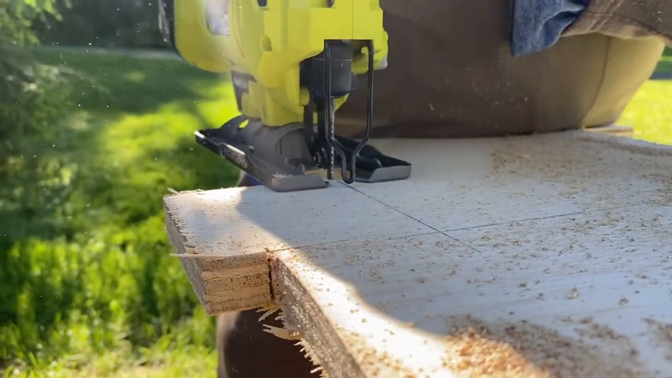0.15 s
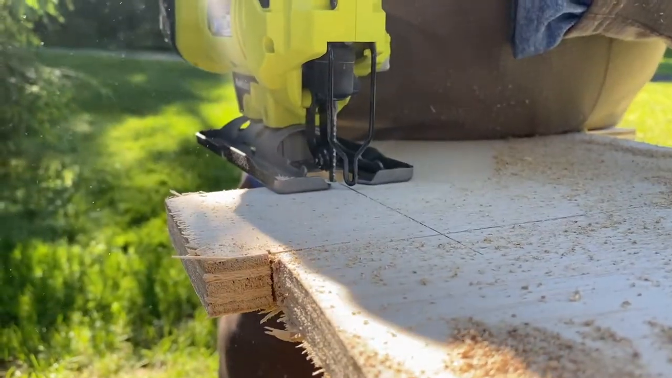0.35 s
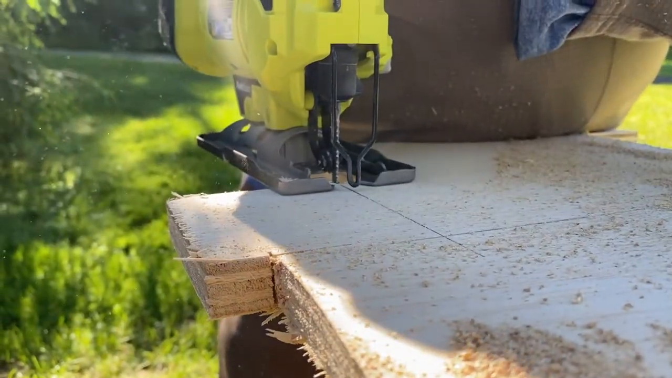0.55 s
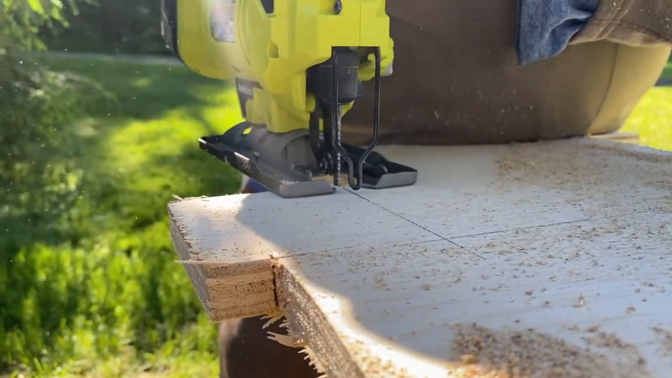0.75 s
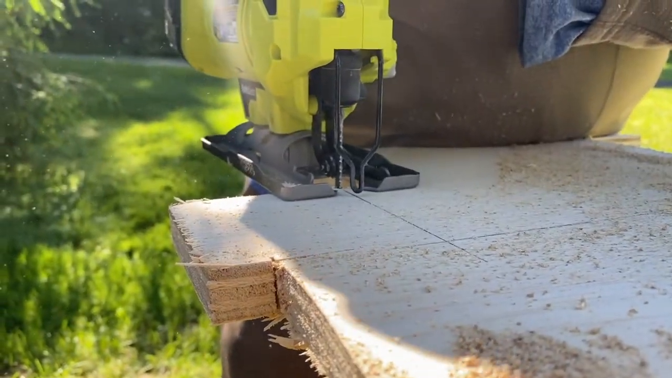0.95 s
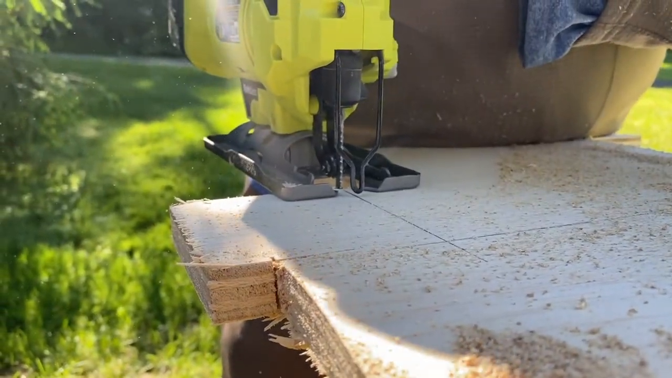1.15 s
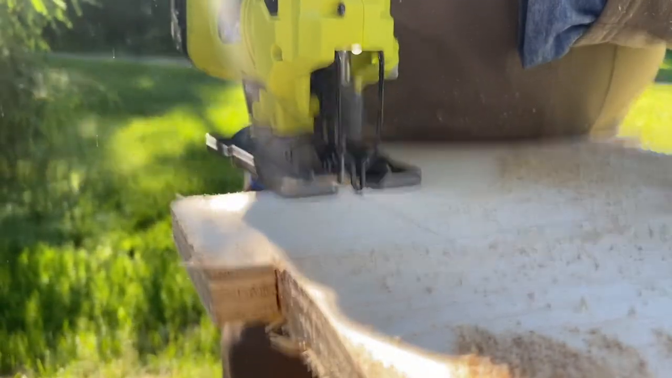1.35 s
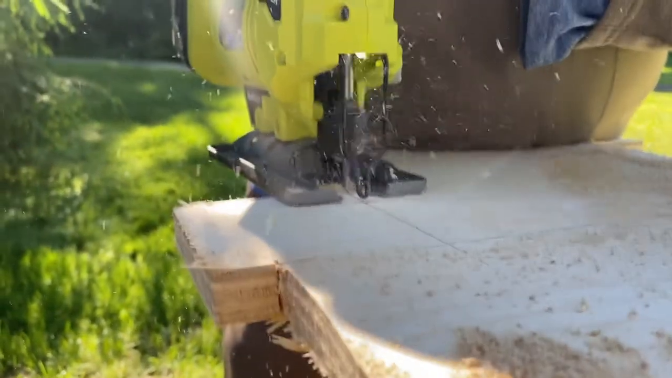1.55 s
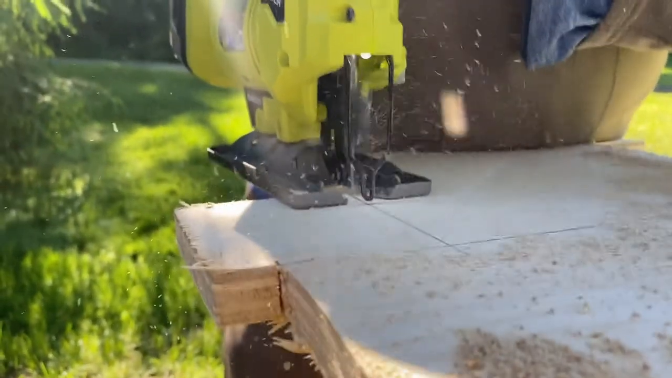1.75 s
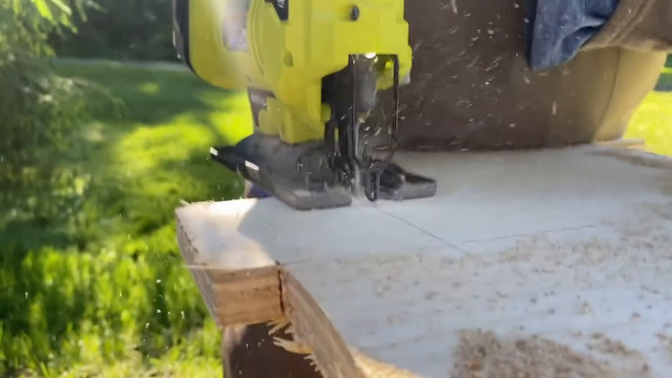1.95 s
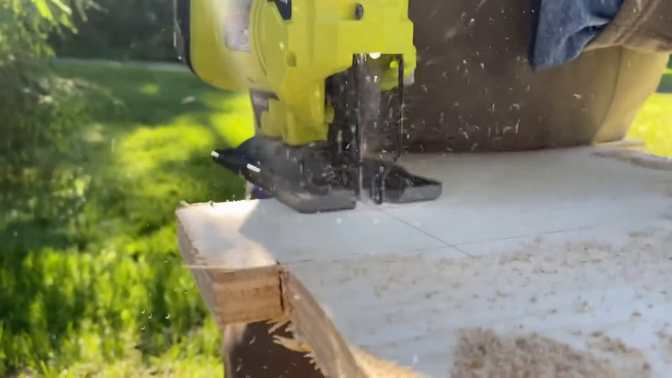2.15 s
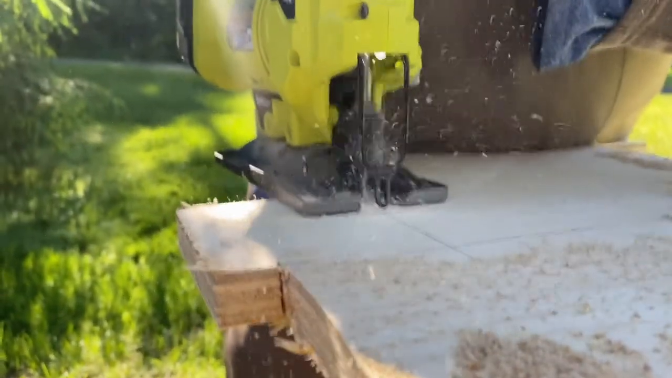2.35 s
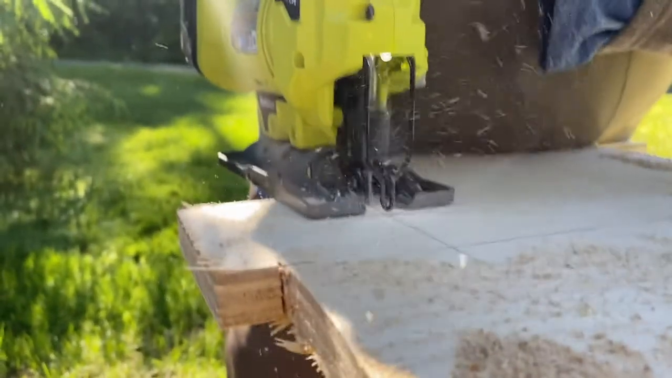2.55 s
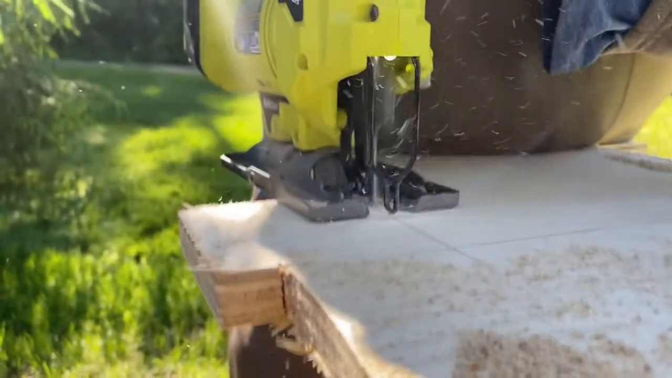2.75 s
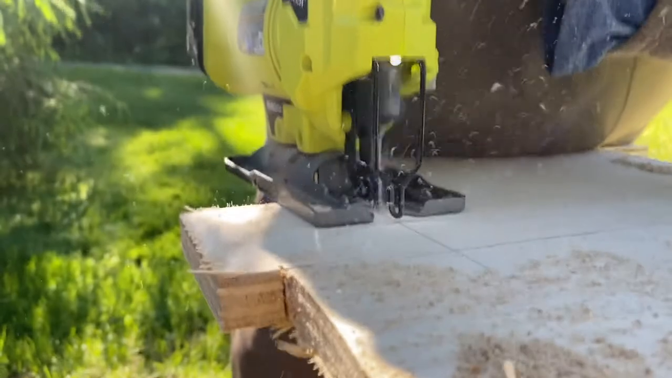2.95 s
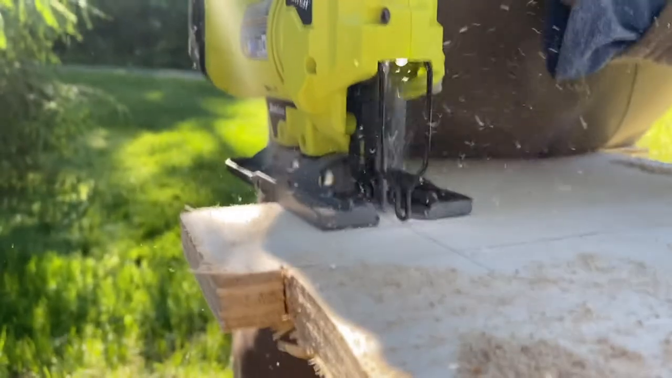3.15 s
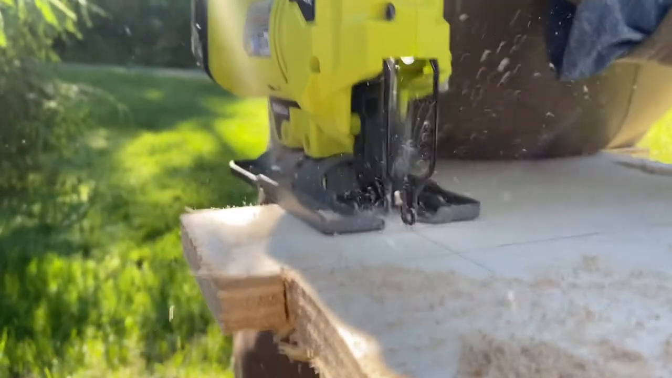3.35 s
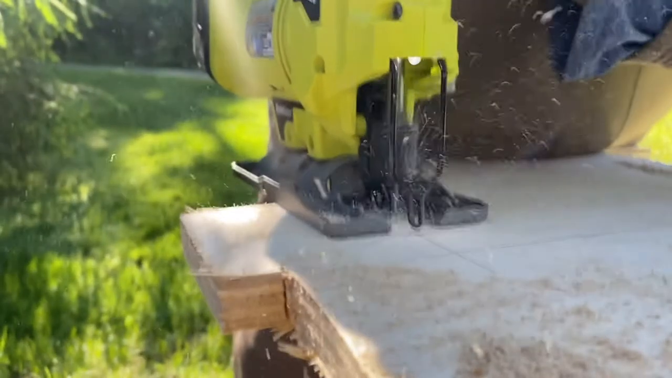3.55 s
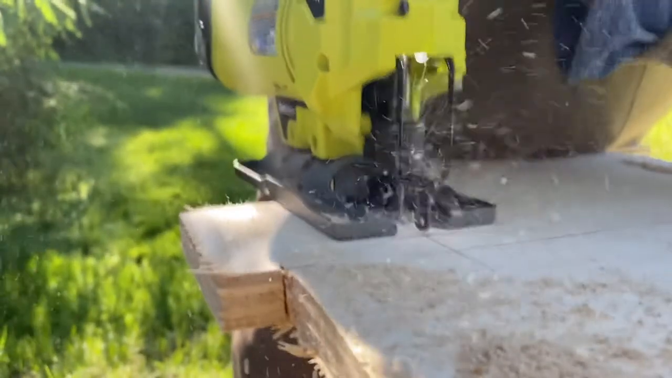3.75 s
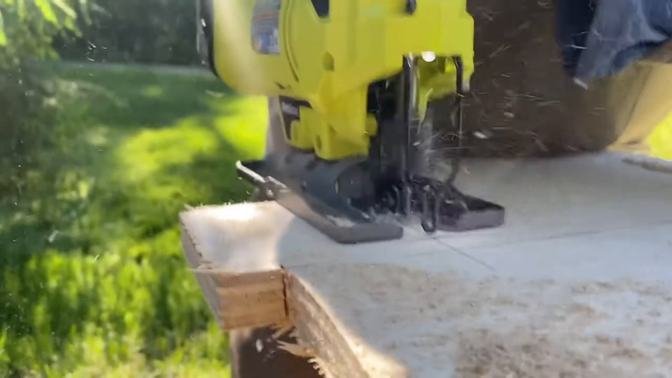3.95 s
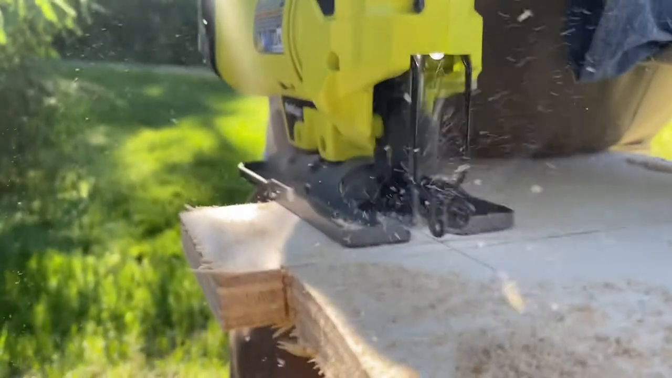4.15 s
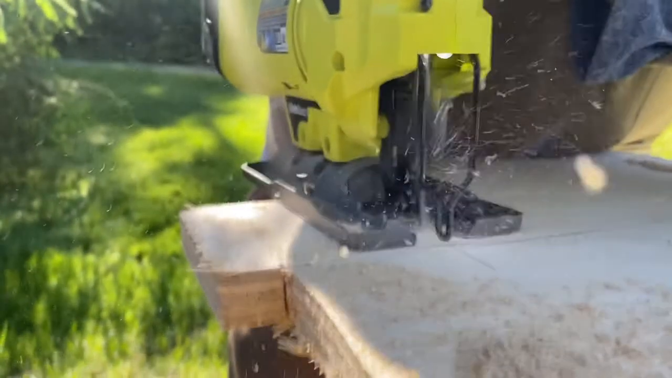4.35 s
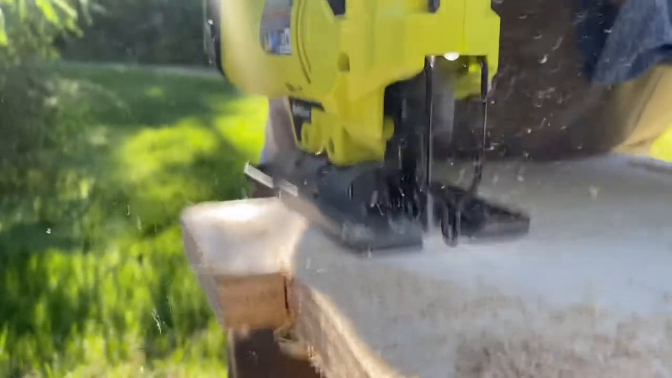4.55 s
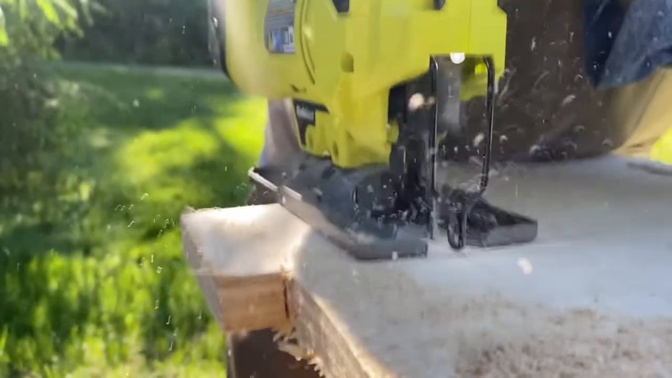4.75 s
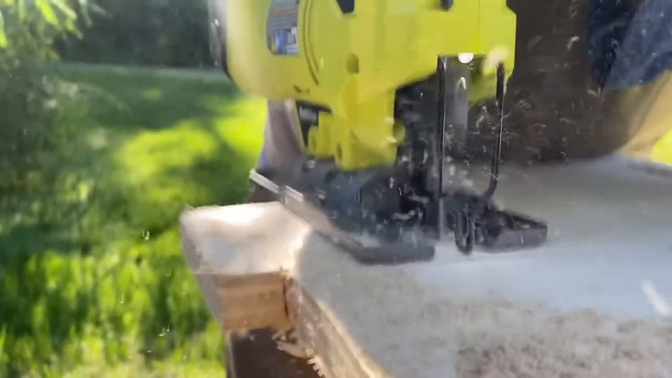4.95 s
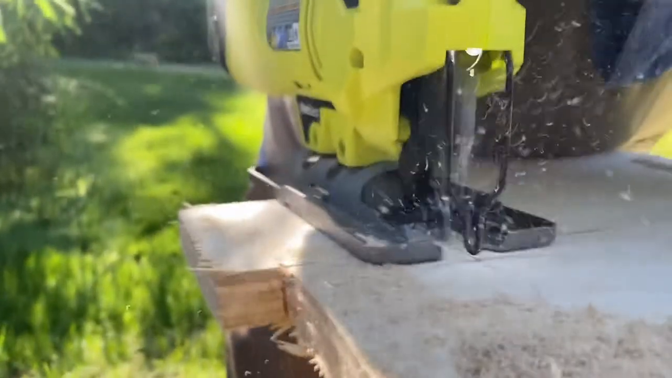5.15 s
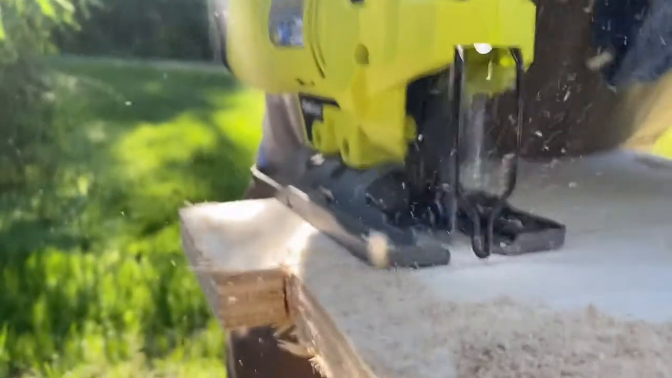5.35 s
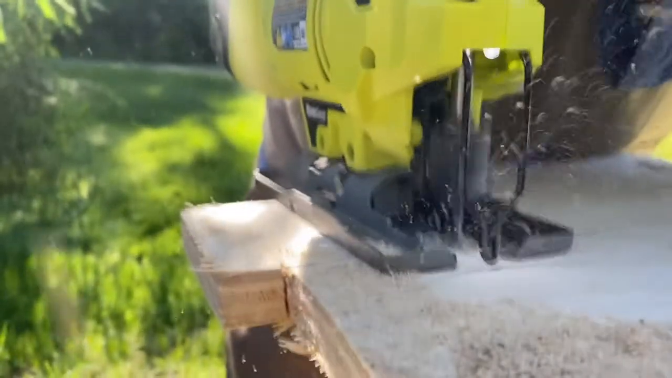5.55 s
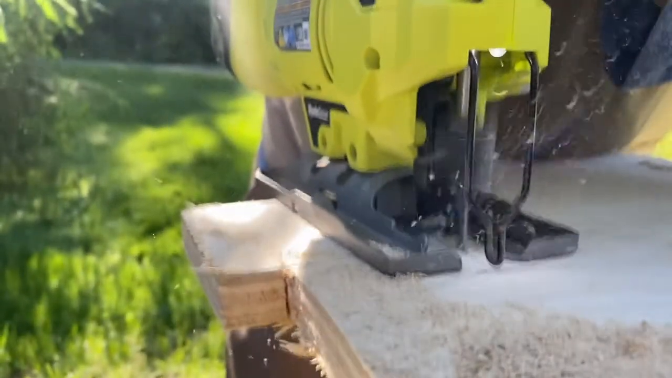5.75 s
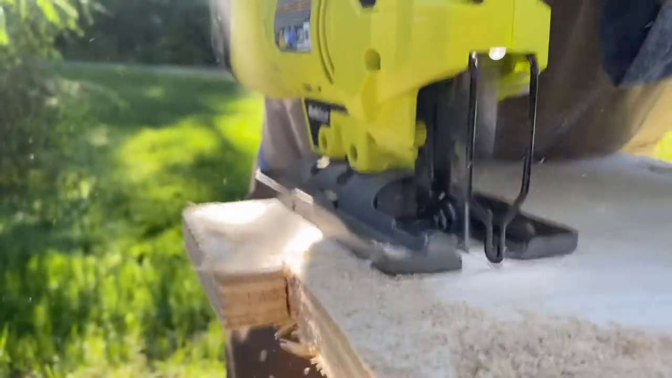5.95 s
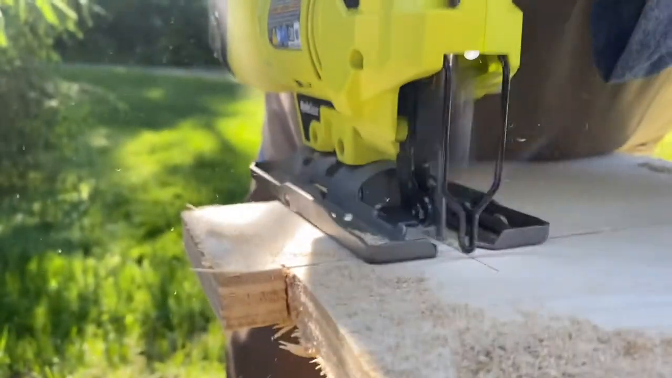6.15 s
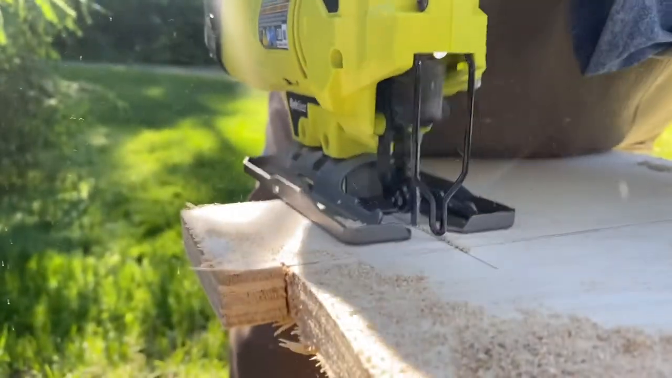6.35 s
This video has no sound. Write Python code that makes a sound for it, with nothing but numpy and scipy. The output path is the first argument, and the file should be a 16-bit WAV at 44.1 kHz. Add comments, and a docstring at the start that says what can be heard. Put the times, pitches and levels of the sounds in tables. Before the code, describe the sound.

Close stereo sound of a cordless jigsaw on a plywood sheet outdoors. Soft taps and a small click come first over barely audible air. Then a dry switch click, a brief rising whine and woody jolts lead into steady, harsh sawing at about fifty strokes a second, with metallic clacks and a shaking low drone. Near the end the cut frees, and the rattle slows and drops in pitch.

```python
"""Outdoors, at a plywood sheet: a hand settles on a cordless jigsaw, the trigger clicks and the blade snags.
The saw speeds up, rasps through the wood about fifty strokes a second and begins to coast down.
Noise torn in bursts makes the rasp; struck rings make the knocks and bumps; sines that follow the strokes
make the hum. Faint coloured noise is the yard. All is heard close by, in stereo."""
import sys
import numpy as np
from scipy import signal
from scipy.fft import rfft, irfft, next_fast_len
from scipy.io import wavfile
from scipy.ndimage import uniform_filter1d

SR = 44100
rng = np.random.default_rng(int(sys.argv[2]) if len(sys.argv) > 2 else 0)


def master_out(mix):
    """Clip the mix to full scale and print it as 16-bit PCM to the path in sys.argv[1]."""
    frames = np.transpose(np.atleast_2d(mix))
    ceiling = np.clip(frames, -1, 1)
    pcm = np.round(ceiling * 32767).astype(np.int16)
    wavfile.write(sys.argv[1], SR, pcm)


N = 282355

GEAR = 7.76  # motor turns per stroke
FULL_SPEED = 50.5  # strokes per s
FIRST_STROKE = 6  # regular impacts set in after the opening snags

# Impacts within one stroke: (place [turns], relative ring level [dB], typical burst height [dB])
STROKE_IMPACTS = [(.29, 1, 4.5), (.44, -12, 3), (.69, 2.5, 4.5), (.85, -2.5, 4.5), (0.99, -9.5, 4)]
# Ringing modes of saw and sheet: (pitch [Hz], relative level [dB], time to fall by 60 dB [s])
BODY_MODES = [(222, -27, 0.007), (274.5, -8, 0.075), (586, 3, 0.041), (899, -4.5, 0.028), (1037, 1, 0.026),
              (1545, -6, 0.022), (1805, -1, 0.0084), (4340, -1, 0.014)]
# Tone colour of torn wood and gear noise: (frequency [Hz], relative level [dB per Hz])
RASP_COLOUR = [(60, -33), (180, -8.5), (260, -1), (620, -3), (780, -10), (950, -3.5), (1250, -7),
               (1600, -8), (1900, -7), (2080, -14.5), (2650, -8.5), (3000, -9), (3700, -10), (4500, -15.5),
               (5500, -14.5), (8000, -15.5), (9300, -14.5), (15700, -23.5)]
# How hard the sheet shakes, and the tone balance:
# (time [s], shake [dB], blend from the fresh to the deep tone balance [0-1])
SHEET_STATE = [(1.36, 7, 0.5), (1.55, -1, 0.06), (1.9, 1, 0), (2.2, -4, 0.13), (2.5, -1, 0.08),
               (3.1, 0.5, 0.12), (3.45, -1.5, 0.86), (3.75, -1, 0.85), (4.3, 0, 1), (4.65, 2, 0.9),
               (4.95, 1, 0.75), (5.55, 2.5, 0.92), (5.75, -1.5, 1), (5.9, -11.5, 0.82), (6.05, -16.5, 0.9),
               (6.13, -3, 0.7), (6.4, -5, 0.4)]
# Rings that move as the cut goes on: (time [s], housing pitch [Hz], first clack re rasp [dB], # second clack re
# rasp [dB], sheet pitch [Hz], gain of the sheet's band in the rasp [dB])
MOVING_RINGS = [(1.45, 1480, -27, -23, 1040, 7.5), (1.7, 1640, -11, -11, 990, 2.5),
                (2.2, 1590, -10, -10, 980, 2.5), (2.75, 1594, -4, -8, 910, 2.5),
                (3.3, 1510, -16, 0.5, 920, 2.5), (3.8, 1514, -1, -2, 900, 3),
                (4.3, 1560, -17, -6.5, 945, 4), (4.8, 1560, -11, -13, 1010, 2),
                (5.3, 1600, -10, -8, 1030, 2.5), (5.62, 1610, -5, -20, 1020, 1),
                (5.7, 1630, -1.5, -20, 1020, 5), (6.04, 1594, -1.5, -14, 1050, 5),
                (6.15, 1540, -14, -14, 1050, 9), (6.4, 1550, -4, -13, 1035, 3.5)]
# Stages of the cut: entry, a third, two thirds, end of cut, blade free, coasting (times [s])
CUT_STAGES = (1.95, 3.15, 4.2, 5.35, 5.93, 6.14)


def amp(db):
    """Turn decibels into a plain factor."""
    return 10 ** (np.asarray(db) / 20)


def evened(x):
    """Bring a signal to an rms of 1."""
    return x / np.sqrt(np.mean(x ** 2) + 1e-20)


def read(points, hz):
    """Read a frequency table between its points, on a log pitch scale."""
    f, value = np.transpose(points)
    return np.interp(np.log(hz + 1), np.log(f + 1), value)


def curve(rows):
    """Columns of a table of timed rows, one value a sample."""
    s, *columns = np.transpose(rows)
    return [np.interp(np.arange(N) / SR, s, column) for column in columns]


def coloured(x, points):
    """Weight the spectrum of x by a table of levels."""
    return irfft(rfft(x) * amp(read(points, np.fft.rfftfreq(N, 1 / SR))), N)


def wander(per_s):
    """Slow chance of rms 1, with so many random points a second joined by lines."""
    points = rng.standard_normal(400)
    return evened(np.interp(np.arange(N) * per_s / SR, np.arange(400), points))


def ring(hz, t60):
    """A struck mode: a sine that falls by 60 dB in t60 seconds."""
    t = np.arange(4000) / SR
    return amp(-60 * t / t60) * np.sin(2 * np.pi * hz * t)


def body_ring():
    """Saw and sheet struck once: all their modes ring together."""
    return sum(amp(db) * ring(hz, t60) for hz, db, t60 in BODY_MODES)


def band(x, lo_hz, hi_hz):
    """The part of x between two fixed frequencies, without delay."""
    return signal.sosfiltfilt(signal.butter(2, [lo_hz, hi_hz], "band", fs=SR, output="sos"), x)


def moving_band(x, hz, width_hz):
    """The part of x around a pitch curve: shift down, smooth, shift back."""
    turn = np.exp(2j * np.pi * np.cumsum(hz * np.ones(N)) / SR)
    smoother = signal.butter(2, width_hz / 2, fs=SR, output="sos")
    return 2 * (turn * signal.sosfiltfilt(smoother, x / turn)).real


def motion():
    """The motor's course: switch, speed, stroke count, rasp level and the gains of two bands of the rasp."""
    # Speed of the blade: (time [s], speed [strokes per s])
    speed_points = [(1.316, 5.2), (1.33, 14), (1.36, 32.4), (1.438, 42.6), (1.49, 46.9), (1.552, 49.8),
                    (1.65, 51.1), (2.25, 51.2), (3.05, 50.8), (3.45, 50.3), (4.25, 50.25), (4.65, 50.6),
                    (5.25, 50.3), (5.85, 51.1), (6.03, 50.2), (6.102, 44.5), (6.19, 39), (6.262, 34.6),
                    (6.4, 26.4)]
    # Loudness of the cut: (time [s], rasp level [dB], gain of the housing's band [dB],
    # gain of the treble [dB])
    level_points = [(1.316, -35, -6, -12), (1.33, -34, -8, -17), (1.352, -28, -13, -12),
                    (1.363, -24, -5, -8), (1.378, -28.5, 5, -6), (1.43, -24, 3, -5), (1.47, -26, 5, -2.5),
                    (1.51, -27, -1, 0), (1.9, -26, 0, -1.5), (2.4, -29.5, 1, 0), (3.1, -29, 3, 1),
                    (3.7, -29.5, 3, 1.5), (4.15, -28.5, 3, 0), (4.8, -28, 1, 0), (5.3, -28, -0.5, 1),
                    (5.6, -26.5, -7, -1), (5.9, -28, 5, 1), (6.05, -28, 0, 0.5), (6.15, -31, 2, -1),
                    (6.4, -32, 0, -9)]
    switch_s, rise_s = 1.316, 0.0029
    on = np.clip((np.arange(N) / SR - switch_s) / rise_s, 0, 1)
    speed = on * curve(speed_points)[0]
    turns = np.cumsum(speed) / SR
    rasp_db, *gains_db = curve(level_points)
    return on, speed, turns, rasp_db, gains_db


def bite(turns, flicker_db=1.06):
    """The teeth tear in bursts after each impact: quick rise, slower fall, a lull once a stroke."""
    burst_fall = .06  # turns
    lull_turn, lull_width, lull_db = .21, .05, -3.5  # the blade stops to turn round
    # no two bursts alike
    chance = 1 + 0.39 * rng.standard_normal((int(turns[-1]) + 2, len(STROKE_IMPACTS)))
    db = np.zeros(N)
    for k, (place, _, height_db) in enumerate(STROKE_IMPACTS):
        since = turns - place
        stroke = (since + 1).astype(int)
        db += height_db * chance[stroke, k] * np.exp(-(since % 1) / burst_fall)
    db += lull_db * np.exp(-((turns % 1 - lull_turn) / lull_width) ** 2)
    flicker = evened(uniform_filter1d(rng.standard_normal(N), 90))
    return amp(uniform_filter1d(db, 20) + flicker_db * flicker)


def rasp(gate, waver_db=2.0, drift_hz=50):
    """Torn fibres and gear noise, drawn twice for stereo; its resonances drift, swell and sink."""
    # Blade and guard sing in the rasp:
    # (pitch at entry [Hz], slide over the cut [Hz], width [Hz], level of the band added to the rasp [dB])
    singing_bands = [(2514, -330, 94, -3), (2960, -100, 133, 0), (3394, -180, 160, -1),
                     (4330, -60, 230, -3), (4750, 0, 120, -5), (5150, 30, 150, -2.5), (5860, -2, 110, 2.5),
                     (6354, -100, 147, 0.5)]
    noise = np.array([evened(coloured(gate * rng.standard_normal(N), RASP_COLOUR)) for _ in range(2)])
    cut_done = np.interp(np.arange(N) / SR, (CUT_STAGES[0], CUT_STAGES[3]), (0, 1))
    out = noise.copy()
    for hz, slide_hz, width_hz, db in singing_bands:
        level = amp(db + waver_db * wander(9))
        pitch = hz + slide_hz * cut_done + drift_hz * wander(2.03)
        out += level * moving_band(noise, pitch, width_hz)
    return out


def knocks(turns, spread_db=5.0, slip=0.0076):
    """Each impact of each stroke rings the body, never quite alike."""
    hits = np.zeros(N)
    count = np.arange(FIRST_STROKE, int(turns[-1]))
    for place, db, _ in STROKE_IMPACTS:
        chance = rng.standard_normal((len(count), 2))
        at = np.searchsorted(turns, count + place + slip * chance[:, 0])
        hits[np.minimum(at, N - 1)] += amp(db + spread_db * np.clip(chance[:, 1], -3, 1.7))
    return evened(signal.oaconvolve(hits, body_ring())[:N])


def clacks(turns, spread_db=2.2, slip=.006):
    """Two sharp blows, at both ends of a stroke, ring the housing at its present pitch."""
    places, t60 = (.27, .66), .027  # turns; s
    hz, *levels_db = curve(MOVING_RINGS)[:3]
    turn = np.exp(2j * np.pi * np.cumsum(hz) / SR)
    count = np.arange(FIRST_STROKE, int(turns[-1]))
    out = np.zeros(N)
    for place, db in zip(places, levels_db):
        chance, hits = rng.standard_normal((len(count), 2)), np.zeros(N)
        at = np.searchsorted(turns, count + place + slip * chance[:, 0])
        hits[at] = amp(spread_db * chance[:, 1])
        rung = turn * signal.lfilter([1], [1, -amp(-60 / t60 / SR)], hits / turn)
        out += amp(db) * evened(rung.imag)
    return out


def loaded(x, speed, gains_db, waver_db=1.1):
    """Rings and treble follow their gains; rings and boom waver at random."""
    boom_balance_db = (0.5, 0)  # gain of the sheet's boom in the fresh and the deep tone balance
    boom_fade_db = 0.16  # lost by the boom for each stroke per s under full speed
    ring_db, treble_db = gains_db
    housing_hz, _, _, sheet_hz, sheet_db = curve(MOVING_RINGS)
    blend = curve(SHEET_STATE)[1]
    boom_db = np.interp(blend, (0, 1), boom_balance_db) + waver_db * wander(13)
    boom_db -= boom_fade_db * (FULL_SPEED - speed)
    # each band is added or taken away until it has its gain
    out = x + (amp(ring_db + waver_db * wander(20)) - 1) * moving_band(x, housing_hz, 350)
    out += (amp(sheet_db + waver_db * wander(13)) - 1) * moving_band(x, sheet_hz, 190)
    out += (amp(boom_db) - 1) * band(x, 130, 660)
    return out + (amp(treble_db) - 1) * band(x, 2770, 22000)


def hum(speed, turns, waver_db=3, low_waver_db=1.1, slip=0.003):
    """The stroke shakes the sheet at its orders; the unbalanced motor shaft adds its own tone."""
    # Low tones before speed scales them: (turns per stroke, level starting [dB], in the fresh balance [dB],
    # in the deep balance [dB], coasting [dB], share of the shake taken)
    low_tones = [(1, -45, -51, -45, -41, -.4), (2, -33, -35, -37, -45, .7), (3, -30, -37, -35.5, -35, 1.2),
                 (4, -33, -26, -37, -48, 1.5), (5, -36, -31, -44, -38, -.7), (6, -35, -33, -24.5, -43, 1.1)]
    # Motor shaft tone: (the same columns without the first)
    shaft_tone = (-35, -31, -27.5, -31, .35)
    # Other stroke orders before speed scales them: (turns per stroke, level at each of the six stages [dB])
    high_orders = [(7, -31.0, -44.0, -38.0, -35.0, -36.0, -33.0),
                   (8, -31.0, -34.0, -41.0, -36.0, -32.0, -35.0),
                   (9, -34.0, -35.0, -38.0, -36.0, -44.0, -35.0),
                   (10, -40.0, -39.0, -35.0, -33.0, -43.0, -48.0),
                   (11, -34.0, -37.0, -41.0, -34.0, -36.0, -43.0),
                   (12, -35.0, -40.0, -37.0, -32.0, -42.0, -47.0),
                   (13, -36.0, -46.0, -39.0, -35.0, -54.0, -48.0),
                   (15, -40.0, -55.0, -48.0, -44.0, -55, -39.0),
                   (16, -42.0, -48.0, -41.0, -40.0, -46.0, -44.0),
                   (17, -42.0, -43.0, -44.0, -43.0, -43.0, -49.0),
                   (18, -36.0, -36.0, -34.0, -37.0, -50.0, -51.0),
                   (19, -50.0, -46.0, -44.0, -48.0, -41.0, -55),
                   (20, -35.0, -42.0, -36.0, -38.0, -55, -50.0), (21, -42.0, -47.0, -55, -40.0, -48.0, -55),
                   (22, -48.0, -55, -46.0, -40.0, -46.0, -55),
                   (23, -39.0, -46.0, -46.0, -44.0, -51.0, -52.0),
                   (24, -46.0, -49.0, -46.0, -49.0, -55, -40.0),
                   (25, -42.0, -46.0, -46.0, -47.0, -52.0, -55),
                   (26, -42.0, -48.0, -41.0, -45.0, -55, -42.0), (27, -38.0, -42.0, -43.0, -53.0, -55, -55),
                   (28, -40.0, -38.0, -51.0, -48.0, -55, -55), (29, -37.0, -33.0, -42.0, -50.0, -55, -55.0),
                   (30, -43.0, -33.0, -37.0, -47.0, -50.0, -55),
                   (31, -40.0, -38.0, -39.0, -38.0, -43.0, -52.0),
                   (32, -40.0, -38.0, -42.0, -46.0, -45.0, -55), (34, -49.0, -43.0, -41.0, -45.0, -55, -55)]
    shake_power = 2.5  # the tones grow with this power of the speed
    engage_db = 3  # the other orders gain this much a stroke until the seventh
    shake_db, blend = curve(SHEET_STATE)
    t = np.arange(N) / SR
    settled = np.interp(t, (1.47, 1.6), (0, 1))  # the start settles
    released = np.interp(t, (6.03, 6.09), (0, 1))  # the trigger is let go
    force_db = 20 * shake_power * np.log10(np.minimum(speed / FULL_SPEED, 1) + 0.00089)
    tones = []
    for k, start_db, fresh_db, deep_db, coast_db, share in low_tones + [(GEAR, *shaft_tone)]:
        cutting_db = fresh_db + (deep_db - fresh_db) * blend + share * shake_db
        db = (1 - settled) * start_db + (settled - released) * cutting_db + released * coast_db
        tones.append((k, db + low_waver_db * wander(8)))
    engaged_db = engage_db * np.minimum(turns - 7, 0)
    for k, *stages_db in high_orders:
        tones.append((k, engaged_db + np.interp(t, CUT_STAGES, stages_db) + waver_db * wander(11)))
    uneven = turns + slip * wander(30)  # no two strokes take quite the same time
    out = np.zeros(N)
    for k, db in tones:
        out += np.sqrt(2) * amp(db + force_db) * np.cos(2 * np.pi * (k * uneven + rng.random()))
    return out


def whine(turns):
    """The motor whines while it pulls away: a short rising tone at a shaft order."""
    shaft_order, loudest_s, spread_s, level_db = 4.1, 1.345, .013, -25
    swell = np.exp(-((np.arange(N) / SR - loudest_s) / spread_s) ** 2)
    return amp(level_db) * swell * np.sin(2 * np.pi * shaft_order * GEAR * turns)


def blows(rows, body_db):
    """Single bumps: one pitch, the body's modes and a short crack."""
    out, t = np.zeros(N), np.arange(4000) / SR
    body = amp(body_db) * body_ring()
    soft_start = np.minimum(t / 0.0011, 1)
    for s, db, hz, t60, crack_db in rows:
        noise = coloured(rng.standard_normal(N), RASP_COLOUR)[:4000]
        crack = amp(crack_db - 60 * t / 0.014) * noise
        bump = amp(db) * (ring(hz, t60) + body + crack) * soft_start
        part = out[round(s * SR):][:4000]
        part += bump[:len(part)]
    return out


def trigger():
    """A dry plastic click: noise that dies away at once."""
    # A finger finds the trigger, then pulls it:
    # (time [s], level before a shared trim [dB], time to fall by 60 dB [s])
    clicks = [(.5175, -55, 0.014), (1.316, -26.5, 0.017)]
    trim_db = -2.5
    out, t = np.zeros(N), np.arange(2000) / SR
    for s, db, t60 in clicks:
        out[round(s * SR):][:2000] += amp(db + trim_db - 60 * t / t60) * rng.standard_normal(2000)
    return out


def yard():
    """Far traffic and air: noise, lumpy in the bass, that wavers in level."""
    # Tone colour of the yard: (frequency [Hz], relative level [dB per Hz])
    yard_colour = [(18, -35), (30, -17), (69, 7.5), (147, -8), (180, -2), (205, -11), (346, -9),
                   (384, -11.5), (1780, -31), (15000, -50)]
    a, b = (evened(coloured(rng.standard_normal(N), yard_colour)) for _ in range(2))
    level = amp(-70 + 2.0 * wander(11.8))
    return level * np.array([a, 0.83 * a + 0.5 * b]) * amp([[-1.1], [1.1]])


def stereo(tones, a, b):
    """Two channels with a phase and a tilt share tones fully and noise a by a set share; b is right only."""
    # Stereo width of the noise by frequency: (frequency [Hz], share common to both channels [0-1])
    common_share = [(60, 0.55), (300, 0.93), (700, 0.52), (950, 1), (1250, 0.36), (1700, 0.76),
                    (2150, 0.17), (2800, 0.93), (3700, 0.28), (4400, 0.73), (5400, 0.12), (6400, 0.61),
                    (7200, 0.16), (8400, 0.9), (9000, 0.98), (10000, 0.42), (11000, 0.87), (12000, .99),
                    (13000, 0.41), (14000, .99), (15000, .5), (15500, 1)]
    # Phase set between left and right: (frequency [Hz], phase [radians])
    phase_points = [(50, 0.57), (100, 0.27), (150, -1.5), (200, 0), (310, 0), (390, 1.15), (500, 0.5),
                    (900, 0.98), (1400, 2.14), (2000, -0.2), (2300, 2.5), (3500, 2), (3900, 7), (4700, 7.5),
                    (5250, 8.5), (5700, 1), (6150, 6.5), (6700, 5), (7400, 5.5), (8700, 2.5), (12700, -4),
                    (13500, -27.5), (14700, -31), (15300, -9.5)]
    # Level of the left channel over the right: (frequency [Hz], difference [dB])
    tilt_points = [(50, -7.5), (100, 2), (150, 1.5), (200, -6.5), (255, -4), (305, -1.5), (350, -1),
                   (392, -1.5), (700, -3.5), (1000, -3.5), (1350, -2), (1800, -4), (2150, -2), (3350, 0.5),
                   (4400, -2.3), (5300, 2), (5950, -3.5), (6600, -0.5), (7500, -0.5), (15000, 0)]
    size = next_fast_len(N + SR)
    hz = np.fft.rfftfreq(size, 1 / SR)
    same = np.clip(read(common_share, hz), 0, 1)
    tilt = amp(read(tilt_points, hz) / 2)  # half for each channel
    tones, a, b = rfft([tones, a, b], size)
    right = (tones + same * a) * np.exp(-1j * read(phase_points, hz)) + np.sqrt(1 - same ** 2) * b
    return irfft([(tones + a) * tilt, right / tilt], size)[:, :N]


def scene():
    """The saw at work, in stereo, over the yard."""
    # Blade snags and bumps:
    # (time [s], level [dB], pitch [Hz], time to fall by 60 dB [s], crack before colouring re level [dB])
    snags = [(1.317, -26, 800, .04, -3), (1.322, -26, 400, .04, -12.5), (1.358, -9.5, 217, 0.052, 6),
             (1.3615, -10.5, 824, 0.041, -2), (1.362, -12, 620, 0.04, -4), (1.391, -8.5, 596, 0.027, 3),
             (1.443, -12, 510, 0.033, 3), (1.4865, -9.5, 566, 0.03, 0), (1.527, -17, 344, 0.051, 0),
             (1.683, -8.5, 360, 0.057, 2), (6.04, -16, 530, .04, -4), (6.066, -16, 537, .035, -4),
             (6.075, -15, 1060, 0.037, 2), (6.16, -18, 1040, 0.066, -3), (6.172, -19, 560, 0.037, -6),
             (6.225, -23, 571, 0.056, -3), (6.317, -23, 563, 0.043, -5)]
    # The hand shifts the saw on the sheet: (the same columns, before a band filter)
    taps = [(.079, -60, 330, .05, -4), (.512, -58, 450, .04, 2), (.5175, -55, 1480, 0.022, 15),
            (.525, -52, 330, 0.05, 0), (.778, -60, 298, 0.065, 2), (.801, -53, 70, 0.11, -20),
            (.955, -51.5, 560, 0.022, 3), (.962, -60, 270, .07, -15), (1.179, -47.5, 560, 0.024, 6),
            (1.187, -52, 130, .06, -20)]
    on, speed, turns, rasp_db, gains_db = motion()
    shared = on * hum(speed, turns) + whine(turns) + trigger()
    shared += blows(snags, -13) + band(blows(taps, -15), 40, 4600)
    parts = np.array([amp(-5) * knocks(turns), *(amp(6.0) * rasp(bite(turns)))])
    struck, a, b = on * amp(rasp_db) * loaded(parts, speed, gains_db)
    return stereo(shared + struck + amp(rasp_db) * clacks(turns), a, b) + yard()


def record(dry):
    """The microphone drops the deepest bass; then a steep filter limits the treble."""
    heard = signal.sosfilt(signal.butter(4, 38, "high", fs=SR, output="sos"), dry)
    edge_hz = 15720
    treble_limit = signal.firwin(511, edge_hz, window=("kaiser", 9), fs=SR)
    return signal.oaconvolve(heard, treble_limit[None], "same")


dry = scene()
out = record(dry)
master_out(out)
```